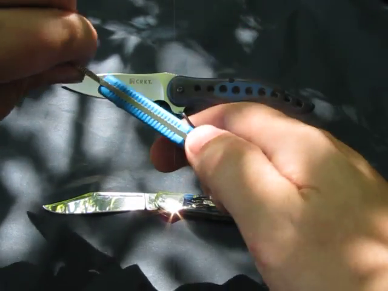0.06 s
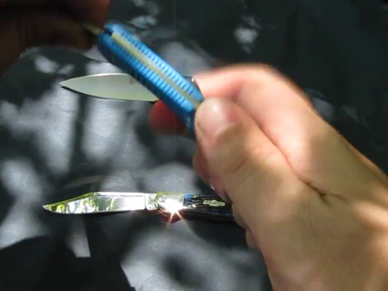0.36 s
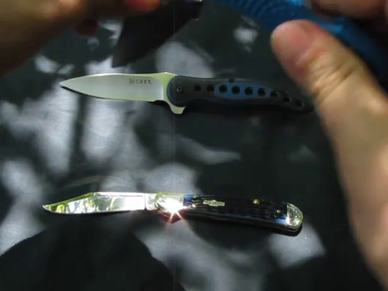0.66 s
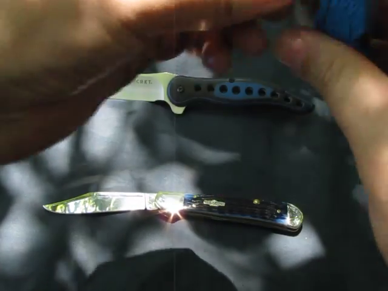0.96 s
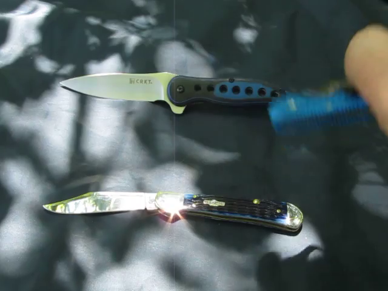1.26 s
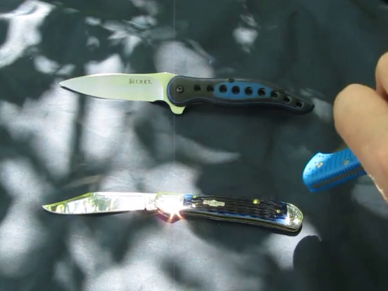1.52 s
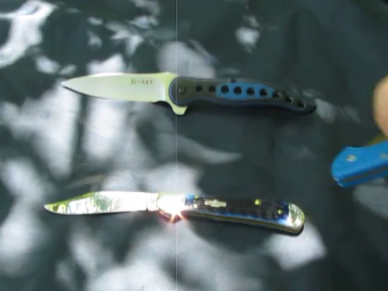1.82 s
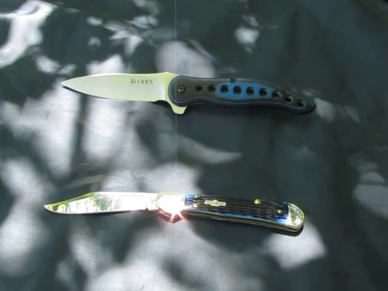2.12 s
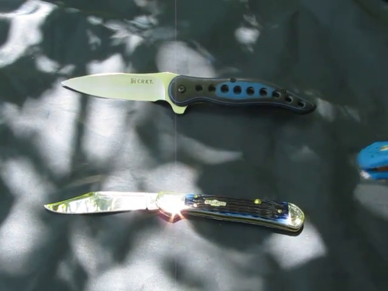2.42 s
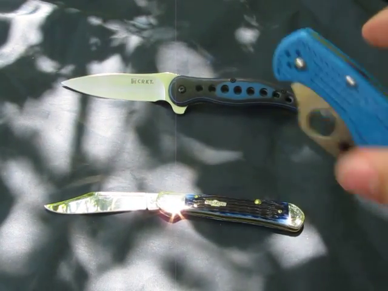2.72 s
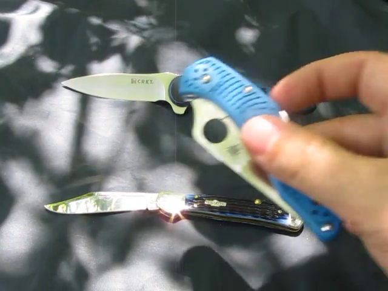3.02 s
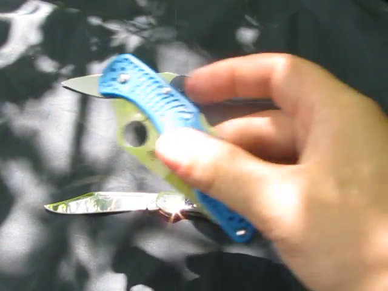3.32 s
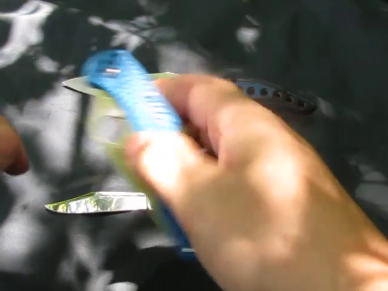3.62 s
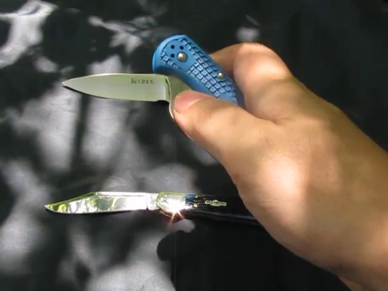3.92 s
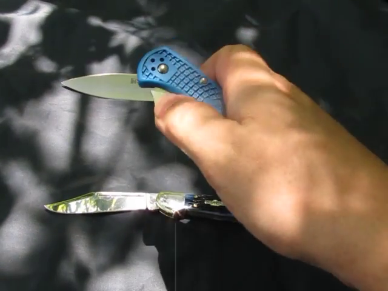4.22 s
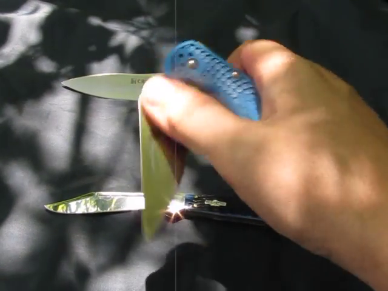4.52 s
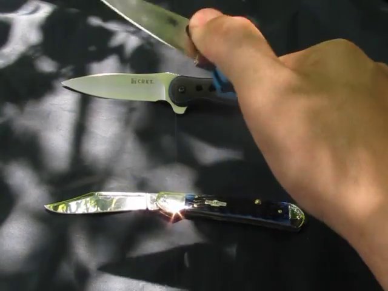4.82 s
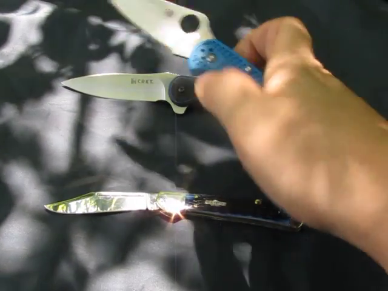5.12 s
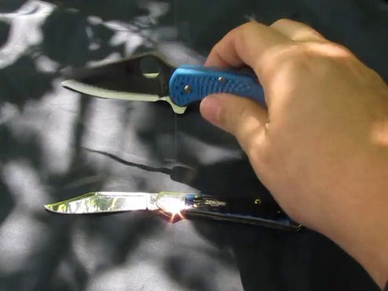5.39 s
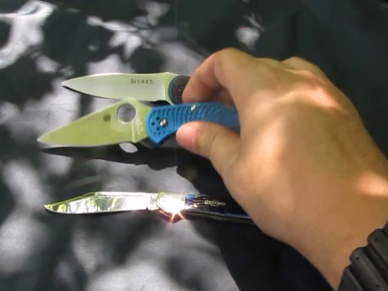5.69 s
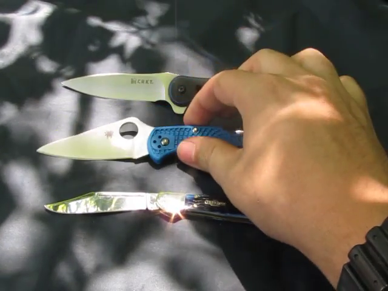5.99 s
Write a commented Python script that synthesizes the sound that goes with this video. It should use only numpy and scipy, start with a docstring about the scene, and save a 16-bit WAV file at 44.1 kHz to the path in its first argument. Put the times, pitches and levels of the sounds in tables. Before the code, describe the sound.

A cricket chirps steadily in a garden over soft hiss, faint traffic and a far engine hum. Very near and almost dry, a pocketknife gives small clicks and closes with a hard steel snap, followed by a short hollow bump. A distant bird calls briefly. The blade then clicks open just as sharply, and the knife lands with a muffled thump on a covered table. The background dips briefly after both snaps.

```python
"""A lock-back folding knife, worked by hand close to the microphone, outdoors. The lock bar ticks, the blade
scrapes round and its spring snaps it shut; the handle bumps something hollow; the blade is thumbed open
until it locks, and the knife is laid on a cloth-covered table. Both snaps overload the input and duck the
gain. In the garden behind, a cricket rubs out chirps with its wings throughout and a far bird calls once;
distant traffic swells over an engine's hum and a soft hiss."""
import sys
import numpy as np
from scipy import signal
from scipy.fft import rfft, irfft, next_fast_len
from scipy.io import wavfile
from scipy.ndimage import uniform_filter1d, map_coordinates

SR = 44100
rng = np.random.default_rng(int(sys.argv[2]) if len(sys.argv) > 2 else 0)


def log_audio(samples):
    """Write samples as a 16-bit WAV file to the path given in sys.argv[1]."""
    # one column per channel
    frames = np.atleast_2d(samples).T
    # limit to full scale, then quantise
    limited = np.clip(frames, -1, 1)
    pcm = np.round(limited * 32767).astype(np.int16)
    wavfile.write(sys.argv[1], SR, pcm)


N = 271215

# Distant tyre roar, traffic rumble and the hiss of the open air.
# Each row: frequency in Hz, relative spectral level in dB.
ROAR_SPECTRUM = [(200, -25), (400, -8.5), (600, -6), (830, -0.5), (1100, -1.5), (1600, -4), (2500, -9),
                 (4000, -16), (8000, -48)]
RUMBLE_SPECTRUM = [(15, -14), (30, -5), (50, 1.5), (110, -2.5), (170, 0.5), (300, -2.5), (500, -10),
                   (1000, -37)]
HISS_SPECTRUM = [(800, -13), (2000, -2), (3500, 0), (5000, 2), (6500, -3), (9000, -7.5), (12000, -15),
                 (15500, -23)]
# The hiss level over time. Each row: time in seconds, level in dB.
HISS_LEVELS = [(.1, -55.3), (1.2, -51.8), (3.8, -50.7), (5.6, -52.5)]
# Spells of a far engine's hum. Each row: start in seconds, end in seconds, level in dB.
HUM_SPELLS = [(-.3, 1, -66), (1.1, 2.25, -63.5), (2.7, 6.5, -68)]
# How alike outdoor noise is at the two microphones. Each row: frequency in Hz, left-right correlation.
MIC_CORRELATION = [(60, 0.9), (130, 0.81), (290, 0.67), (640, 0.76), (1410, 0.4), (3100, 0.065),
                   (6820, -0.2), (15000, 0.036)]
# Reflections from the garden, and from table and hands close by.
# Each row: frequency in Hz, time to fall 60 dB in seconds.
GARDEN_DECAY = [(2000, .35), (6000, .3)]
NEARBY_DECAY = [(200, 0.12), (1500, 0.25), (4500, .21), (9000, 0.19), (14000, .12)]
# The notes of a far bird's slurred call. Each row: start in seconds, length in seconds,
# first pitch in Hz, last pitch in Hz, level in dB, burr as a share of the pitch.
BIRD_CALL = [(2.688, .025, 3420, 3290, -53, .01), (2.72, .053, 2420, 2210, -46.5, .007),
             (2.788, .04, 2370, 2860, -44.5, .022), (2.829, .025, 2700, 2790, -40.3, .042)]
# A cricket's chirps. Each entry: time of the first wing stroke in seconds.
CHIRP_TIMES = [-.02, .266, .534, .798, 1.087, 1.378, 1.66, 1.96, 2.256, 2.519, 2.77, 3.151, 3.502, 3.862,
               4.304, 4.896, 5.217, 5.473, 5.781, 6.111]
# Resonances of the table, the hollow thing, the lock bar, and the knife shut and open.
# Each row: frequency in Hz, bandwidth in Hz, relative level in dB.
TABLE_MODES = [(169.7, 20, 8), (238, 66, 0.5), (352, 100, -4), (560, 240, -14)]
HOLLOW_MODES = [(130, 32, -7.5), (272, 45, -8), (309, 47, -3), (528, 39, 7.5), (680, 43, 4.5),
                (777, 39, 4.5), (905, 69, 0.5), (980, 64, -2), (1066, 89, 4.5), (1220, 120, -9.5),
                (1500, 150, -17), (1970, 100, -6), (3100, 130, -8), (3970, 98, -14)]
LOCK_BAR_MODES = [(2190, 330, -1), (2760, 200, 2.5), (4200, 400, -16.5), (5300, 700, -14.5),
                  (7200, 480, -7.5), (8350, 500, -10.5), (10300, 330, -16.5), (11500, 800, -21),
                  (14200, 1200, -45.5)]
CLOSED_KNIFE_MODES = [(605, 650, -19.5), (3120, 450, -0.5), (4510, 225, 2), (5200, 350, -1),
                      (6660, 740, -8), (8370, 690, -7.5), (10700, 1100, -12), (12420, 770, -7.5),
                      (14800, 1100, -15.5)]
OPEN_KNIFE_MODES = [(1960, 350, -17), (2840, 530, -2), (4190, 320, 0), (5460, 290, -7.5),
                    (7170, 1670, -10.5), (8610, 390, -13), (9410, 330, -14.5), (12360, 1000, -13.5),
                    (14770, 1270, -11)]
# The handle bumps the hollow thing; knife and hand settle on the table.
# Each row: start in seconds, level in dB, crack level against the ring in dB.
HANDLE_BUMPS = [(1.662, -32, -14), (1.6947, -13, -8), (1.6992, -5.5, -4), (1.709, -14.5, -9),
                (1.7247, -14.5, -8), (1.7305, -22, -8)]
TABLE_THUDS = [(5.9705, -29, -32), (5.978, -19.3, -14), (5.998, -27, -32), (6.027, -35.5, -28)]
# The colour of sliding steel. Each row: frequency in Hz, relative spectral level in dB.
SCRAPE_SPECTRUM = [(530, -58), (900, -29.5), (2070, -3.5), (2760, -14), (3000, -2), (4390, 1), (6980, -7.5),
                   (8340, -12), (9510, -15), (15500, -23)]
# Sliding strokes; the first two rows are so brief that they sound as ticks. # Each row: middle in seconds, half
# length in seconds, level in dB, tilt in dB per octave.
SLIDE_STROKES = [(.356, .0019, -46, 2), (.375, .002, -41, 3), (.393, .009, -31.2, 0),
                 (.483, .016, -40.3, -1.5), (.764, .05, -57, 5), (.859, .015, -46.5, 5),
                 (2.203, .037, -60, 9), (3.684, .045, -60, 7), (4.518, .021, -50, 3.5),
                 (4.617, .039, -55, 9)]
# Light ticks of lock bar and pivot. Each row: start in seconds, level in dB, tilt in dB per octave.
LOCK_TICKS = [(.198, -35, 5), (.2233, -15, 2.5), (.2269, -29, -6), (.3845, -22, 4), (.478, -27, 3),
              (4.5331, -21.5, -6), (4.5395, -23, -9), (4.723, -30.5, 0), (4.773, -31, -2.5),
              (4.933, -29, -2)]
# The blade passes its detent, snaps shut and chatters in the handle.
# Each row: start in seconds, level in dB.
SHUT_CONTACTS = [(.8564, -29), (.8769, 9), (.8799, -4), (.8814, -5), (.8829, -16.5)]
# The lock bar slides off the tang and drops into its notch. Each row: start in seconds, level in dB.
LOCK_CONTACTS = [(4.8111, -13.5), (4.8119, 13.5)]


def amp(db):
    """Decibels to gain."""
    return 10 ** (np.asarray(db) / 20)


def unit(x):
    """x at rms 1."""
    return x / np.sqrt(np.mean(x ** 2) + 1e-20)


def clock():
    """The time of every sample in seconds."""
    return np.arange(N) / SR


def along(points, hz):
    """Read (Hz, value) points on a log frequency axis."""
    freqs, values = np.transpose(points)
    return np.interp(np.log(hz + 1), np.log(freqs + 1), values)


def wobble(rate):
    """A smooth random curve, rate knots a second."""
    return map_coordinates(rng.standard_normal(int(N * rate / SR) + 4), [clock() * rate])


def filtered(x, response):
    """x through a filter whose gain is response(hz)."""
    n = x.shape[-1]
    padded = next_fast_len(n + SR // 8)
    return irfft(rfft(x, padded) * response(np.fft.rfftfreq(padded, 1 / SR)), padded)[..., :n]


def add(track, start, sound):
    """Mix a sound into the track from start seconds."""
    part = track[..., max(round(start * SR), 0):][..., :sound.shape[-1]]
    part += sound[..., :part.shape[-1]]


def panned(x, right_db, lag_samples=0):
    """x in stereo, louder by right_db and earlier by lag_samples at the right microphone."""
    left, right = x * amp([[-right_db / 2], [right_db / 2]])
    return np.array([np.pad(left, (lag_samples, 0))[:len(left)], right])


def echo(x, decay):
    """Diffuse stereo reflections; each frequency dies at its own speed."""
    hz, t, noise = signal.stft(rng.standard_normal((2, SR // 2)), SR, nperseg=256)
    tail = signal.istft(noise * amp(-60 * t / along(decay, hz)[:, None]), SR, nperseg=256)[1]
    return signal.fftconvolve(x[None], tail / np.linalg.norm(tail[0]), axes=1)[:, :N]


def rush(spectrum, patchy_db):
    """Outdoor noise of rms 1 with patches of random gain; the lows are most alike at both microphones."""
    def mid_side_gains(hz):
        angle = np.arccos(np.clip(along(MIC_CORRELATION, hz), -1, 1)) / 2
        return amp(along(spectrum, hz)) * [np.cos(angle), np.sin(angle)]

    noise = signal.stft(rng.standard_normal((2, N)), nperseg=512)[2]
    patches = uniform_filter1d(rng.standard_normal(noise.shape[1:]), size=6, axis=0)
    patches = unit(uniform_filter1d(patches, size=14, axis=1))
    pair = signal.istft(noise * amp(patchy_db * patches), nperseg=512)[1][:, :N]
    mid, side = filtered(pair, mid_side_gains)
    return unit(np.array([mid + side, mid - side]))


def hiss():
    """A soft, wide hiss behind everything."""
    return amp(np.interp(clock(), *np.transpose(HISS_LEVELS))) * rush(HISS_SPECTRUM, patchy_db=.85)


def traffic(roar_db_per_s=1.8, rumble_db_per_s=1.1):
    """Tyre roar and low rumble swell evenly as distant traffic draws nearer."""
    t = clock()
    roar = amp(-55.2 + roar_db_per_s * t + .25 * wobble(6.5)) * rush(ROAR_SPECTRUM, patchy_db=1)
    rumble = amp(-63.3 + rumble_db_per_s * t + .48 * wobble(20)) * rush(RUMBLE_SPECTRUM, patchy_db=1.5)
    return roar + rumble


def engine(hum_hz=108, fade_s=.35):
    """A far engine hums on one slightly unsteady note, fading in and out."""
    t = clock()
    level = sum(amp(db) * np.clip(np.minimum(t - start, end - t) / fade_s, 0, 1)
                for start, end, db in HUM_SPELLS)
    waver = amp(1.8 * wobble(4.6))
    hz = hum_hz + 1.2 * wobble(5.1)
    return level * waver * unit(np.sin(2 * np.pi * np.cumsum(hz) / SR))


def bird():
    """One call from far off in the garden: the first notes fall cleanly, the last rise and turn burry."""
    call = np.zeros(N)
    for start, length, first_hz, last_hz, db, burr in BIRD_CALL:
        progress = np.clip((clock() - start) / length, 0, 1)
        hz = (first_hz + (last_hz - first_hz) * progress) * (1 + burr * wobble(400))
        swell = np.sqrt(4 * progress * (1 - progress))
        call += amp(db) * swell * np.sin(2 * np.pi * np.cumsum(hz) / SR)
    return call + amp(-1) * echo(call, GARDEN_DECAY)


def cricket(pitch_hz=5205, rise_hz=26, sag_hz=45, rough_hz=45, drift_hz=16, gap_s=.0395, half_s=.0044):
    """A cricket, a little to the right: three wing strokes a chirp, each sagging as the wings slow."""
    out = np.zeros(N + SR)  # the first second is a lead-in, so the song is already under way
    t = np.arange(-SR // 40, SR // 40) / SR
    sag = sag_hz * np.maximum(t / half_s + .5, 0) ** 2
    swell = np.exp(-.5 * (t / half_s) ** 2)
    for start in CHIRP_TIMES:
        chirp_hz = pitch_hz + drift_hz * rng.standard_normal()
        for stroke in range(3):
            # the scraper crosses the file unevenly
            teeth = unit(uniform_filter1d(rng.standard_normal(len(t)), size=90))
            hz = chirp_hz + stroke * rise_hz + rough_hz * teeth - sag
            note = swell * np.sin(2 * np.pi * np.cumsum(hz) / SR)
            db = -45.9 - 3 * (stroke == 0) + 1.2 * rng.standard_normal()  # the first stroke is weaker
            add(out, 1 + start + stroke * gap_s + t[0], amp(db) * note)
    song = out[SR:]
    return panned(song, right_db=3) + amp(-.7) * echo(song, GARDEN_DECAY)


def strike(modes, crack_db, crack_s, crack_hz, scatter_db, spread, tilt_db=0, low_cut_ratio=.65):
    """One close contact in stereo: damped modes ring over a short crack of noise below crack_hz."""
    t = np.arange(SR // 6) / SR
    hz, width, db = np.transpose(modes)[..., None]
    scatter = scatter_db * rng.standard_normal((2, len(hz), 1))
    size = width * amp(db + tilt_db * np.log2(hz / hz[0]) + scatter)
    # neighbouring modes swing against each other, and each reaches the two microphones at its own phase
    phase = np.pi * np.arange(len(hz))[:, None] + spread * rng.standard_normal((2, len(hz), 1))
    ring = np.sum(size * np.exp(-np.pi * width * t) * np.cos(2 * np.pi * hz * t + phase), axis=1)
    grit = rng.standard_normal(len(t)) + spread * rng.standard_normal((2, len(t)))
    grit = unit(signal.lfilter(*signal.butter(2, crack_hz, fs=SR), grit))
    crack = amp(crack_db) * np.exp(-t / crack_s) * grit
    # a small body radiates little below its lowest mode
    low_cut = signal.butter(2, hz.min() * low_cut_ratio, "high", fs=SR)
    return signal.lfilter(*low_cut, ring / np.abs(ring).max() + crack)


def knocks():
    """The handle rattles on something hollow to the right; later the knife thuds on the covered table."""
    out = np.zeros((2, N))
    for start, db, crack_db in HANDLE_BUMPS:
        bump = strike(HOLLOW_MODES, crack_db, crack_s=.0012, crack_hz=4900, scatter_db=.5, spread=.7)
        add(out, start, amp(db) * panned(bump, right_db=5.5, lag_samples=4))
    for start, db, crack_db in TABLE_THUDS:
        thud = strike(TABLE_MODES, crack_db, crack_s=.0043, crack_hz=2480, scatter_db=.5, spread=.066)
        add(out, start, amp(db) * thud)
    return out


def sliding():
    """Close up, the tang rubs along the lock bar and skin slides on the handle: dense tiny slips. The shortest
    strokes are over so quickly that they sound as ticks."""
    out = np.zeros((2, N))
    t = np.arange(-SR // 8, SR // 8) / SR
    for middle, half_s, db, tilt_db in SLIDE_STROKES:
        slips = rng.standard_normal(len(t)) * amp(4 * rng.standard_normal(len(t)))
        pair = slips + .5 * rng.standard_normal((2, len(t)))
        rub = unit(filtered(pair, lambda hz: amp(along(SCRAPE_SPECTRUM, hz) + tilt_db * np.log2(hz + 1))))
        add(out, middle + t[0], amp(db) * rub * np.exp(-.5 * (t / half_s) ** 2))
    return out


def blade():
    """At the microphone, the spring drives steel on steel: a brief ring, different shut and open."""
    out = np.zeros((2, N))
    for start, db in SHUT_CONTACTS:
        snap = strike(CLOSED_KNIFE_MODES, crack_db=-18, crack_s=.0013, crack_hz=11000,
                      scatter_db=2.2, spread=.3, low_cut_ratio=.3)
        add(out, start, amp(db) * panned(snap, right_db=4, lag_samples=1))
    for start, db in LOCK_CONTACTS:
        snap = strike(OPEN_KNIFE_MODES, crack_db=-24, crack_s=.00032, crack_hz=14000,
                      scatter_db=.4, spread=.34)
        add(out, start, amp(db) * snap)
    for start, db, tilt_db in LOCK_TICKS:
        tick = strike(LOCK_BAR_MODES, crack_db=-19.5, crack_s=.0015, crack_hz=9000,
                      scatter_db=2, spread=.35, tilt_db=tilt_db)
        add(out, start, amp(db) * panned(tick, right_db=1))
    return out


def scene():
    """The knife is close and almost dry; table and hands reflect it faintly, the garden lies behind."""
    steel, blows = blade() + sliding(), knocks()
    reflections = echo(amp(-23.5) * steel.mean(axis=0) + amp(-15.5) * blows.mean(axis=0), NEARBY_DECAY)
    garden = cricket() + bird()
    distance = panned(traffic() + hiss() + engine(), right_db=.47)
    return steel + blows + reflections + garden + distance


def gain_control(x, overload_db=-4.5, duck_db=11.5, attack_s=.03, hold_s=.17, release_s=.45):
    """Automatic input gain: an overload pulls it down; it holds, then recovers ever more slowly."""
    power = uniform_filter1d(np.mean(x ** 2, axis=0), size=44)  # over one millisecond
    overload = power > amp(overload_db) ** 2
    since_overload = clock() - np.maximum.accumulate(np.where(overload, clock(), -np.inf))
    cut_db = duck_db * np.exp(-np.maximum(since_overload - hold_s, 0) / release_s)
    pole = np.exp(-1 / (attack_s * SR))
    return amp(-signal.lfilter([1 - pole], [1, -pole], cut_db))


def record(dry, top_hz=16100):
    """The microphone input flattens peaks at full scale, rides its gain and cuts steeply above top_hz."""
    ducked = np.clip(dry, -1, 1) * gain_control(dry)
    return filtered(ducked, lambda hz: 1 / (1 + (hz / top_hz) ** 80))


dry = scene()
out = record(dry)
log_audio(out)
```